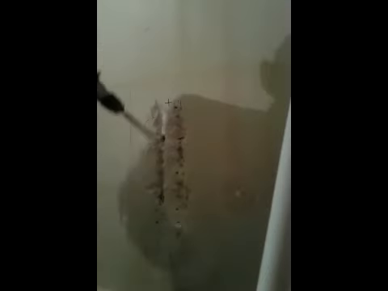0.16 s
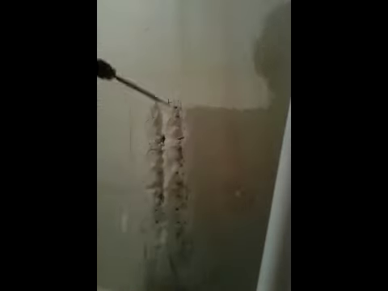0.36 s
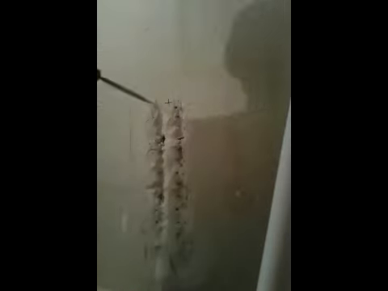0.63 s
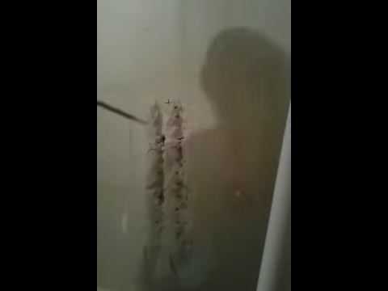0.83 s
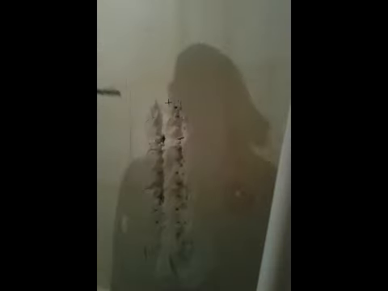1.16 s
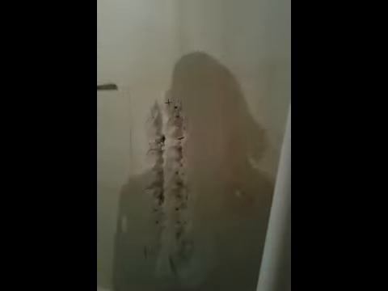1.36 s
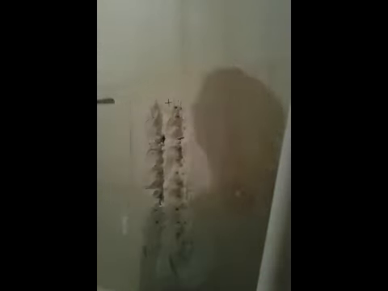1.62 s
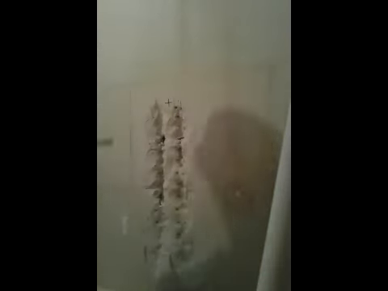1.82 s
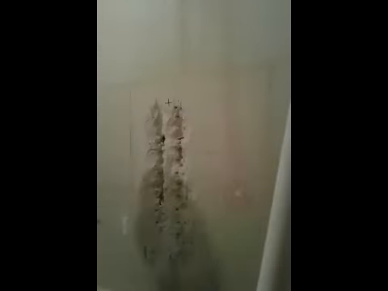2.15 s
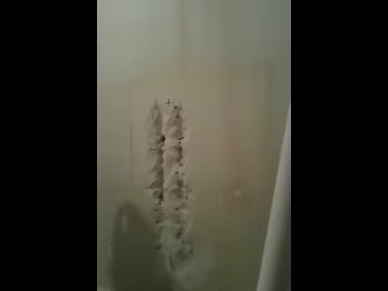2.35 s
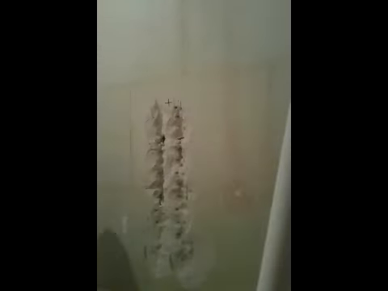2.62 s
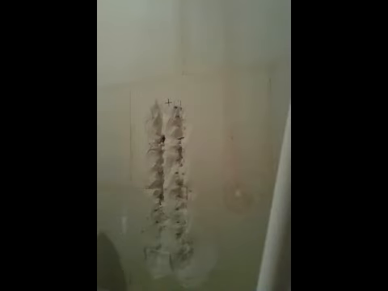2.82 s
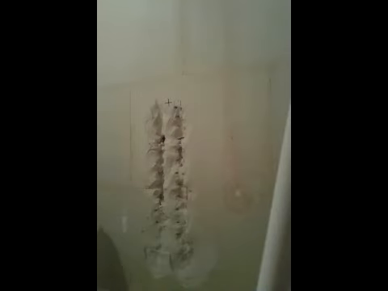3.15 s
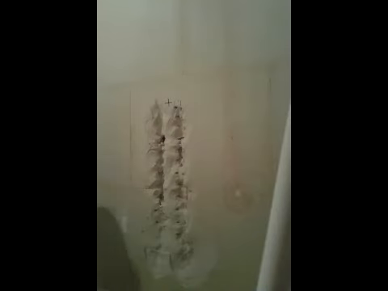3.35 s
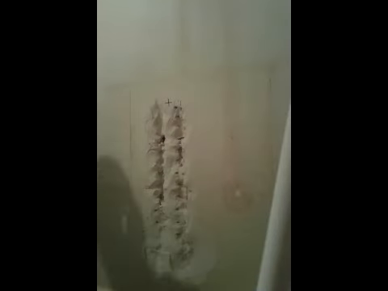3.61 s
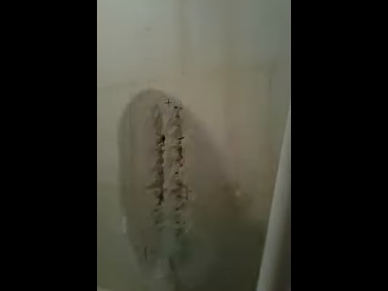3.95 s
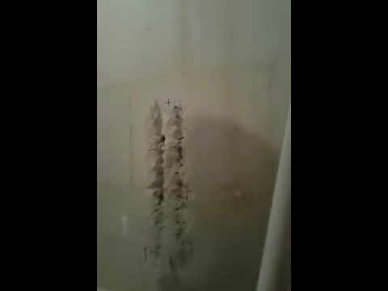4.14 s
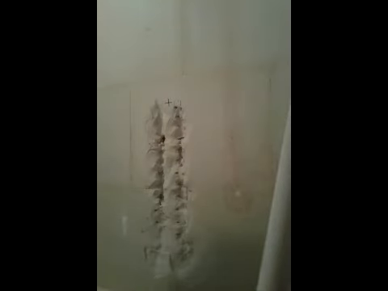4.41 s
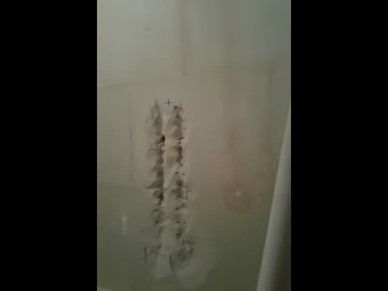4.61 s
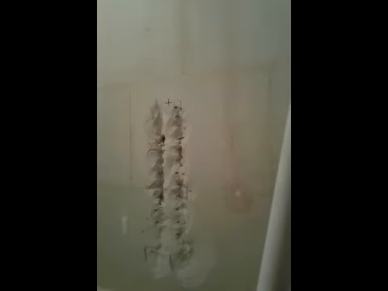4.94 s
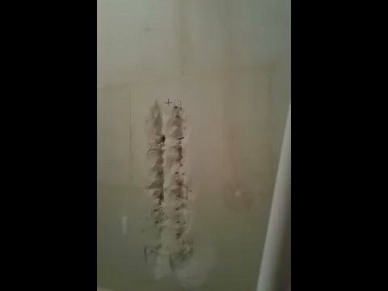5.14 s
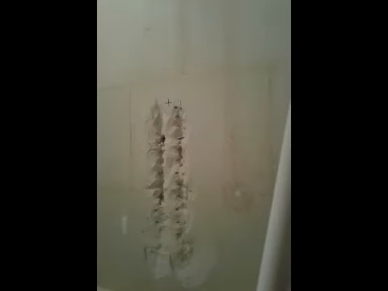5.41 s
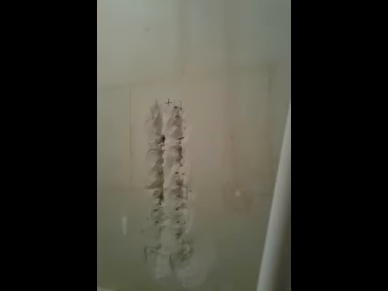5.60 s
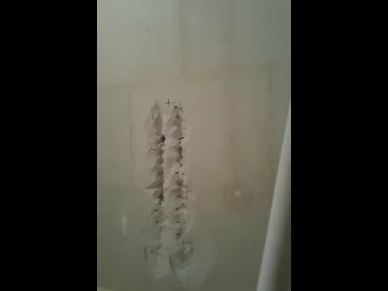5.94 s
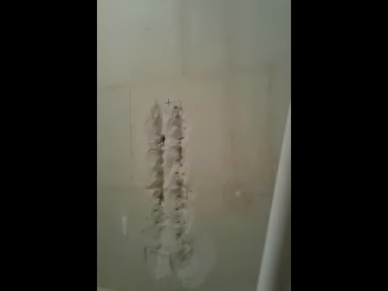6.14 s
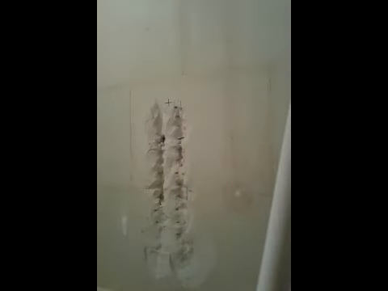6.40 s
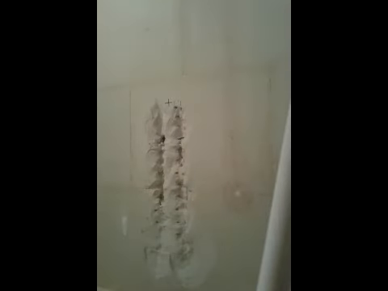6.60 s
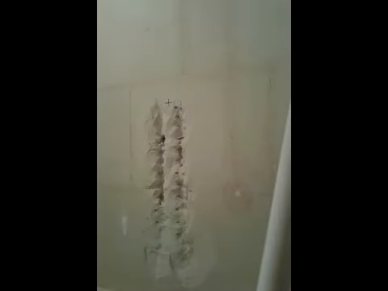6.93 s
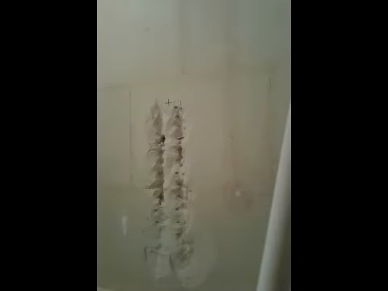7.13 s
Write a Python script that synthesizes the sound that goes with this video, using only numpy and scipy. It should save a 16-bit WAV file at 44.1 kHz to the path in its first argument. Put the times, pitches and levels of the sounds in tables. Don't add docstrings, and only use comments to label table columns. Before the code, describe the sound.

From 0 s a hammer drill, just switched off, spins down close to a mono phone microphone in a small, bare, echoing room. There is no hammering, only a dense scratchy brush noise with gear rattle, rushing fan air and piercing whines that slide continuously lower. It starts loudest, eases within the first second, then holds fairly steady to about 4 s. A low buzz from a far machine comes through the walls around 1-2.6 s. Tiny skips roughen the motor, with a sharp jolt near 2.3 s and a dull thump at 3.1 s. From 4.5 s the noise thins to a slower, low scratch, fading fast after 5.3 s and gone by about 6 s. Then, over faint hiss, shoes scuff on plaster grit at 6.26 s, the tool knocks the floor around 6.5-6.7 s, and a louder scrape and clack end it at 7.1-7.2 s.

```python
import sys
import numpy as np
from scipy import signal
from scipy.fft import rfft, irfft, next_fast_len
from scipy.io import wavfile
from scipy.ndimage import uniform_filter1d

SR = 44100
rng = np.random.default_rng(int(sys.argv[2]) if len(sys.argv) > 2 else 0)


def invert_db(x):
    u = np.asarray(x, float) / 20
    return 10 ** u


def to_wav(sig):
    pcm = np.clip(np.atleast_2d(sig), -1, 1) * 32767
    pcm = np.round(pcm).astype(np.int16)
    wavfile.write(sys.argv[1], SR, pcm.T)


N = 320597
T = np.arange(N) / SR
START_RPS = 421.9
TOP_HZ = 14090
RUMBLE_DB, RUMBLE_PER_WEIGHT = -24, 1.66


def unit(x):
    return x / np.sqrt(np.mean(x ** 2))


def colour(x, points):
    hz, db = np.transpose(points)
    size = next_fast_len(N)
    f = np.maximum(np.arange(size // 2 + 1) * SR / size, 1)
    gain = invert_db(np.interp(np.log(f), np.log(hz), db))
    return irfft(rfft(x, size) * gain, size)[:N]


def band(x, lo_hz, hi_hz):
    sos = signal.butter(4, [lo_hz, min(hi_hz, .45 * SR)], "bandpass", fs=SR, output="sos")
    return signal.sosfilt(sos, x)


def walk(rate):
    hold = int(SR / rate)
    steps = np.repeat(rng.standard_normal(N // hold + 1), hold)
    return unit(uniform_filter1d(uniform_filter1d(steps, hold), hold)[:N])


def grit(rate, spread_db):
    happens, sign, size = rng.random((3, N))
    return (happens < rate / SR) * np.sign(sign - .5) * invert_db(-spread_db * np.log(1 - size))


def room(x):
    t60_s, echo_db = 0.44, 0.5
    t = T[:SR // 2]
    tail = rng.standard_normal(len(t)) * np.exp(-np.log(1000) * t / t60_s) * (t > .003)
    tail *= invert_db(echo_db) / np.sqrt(np.sum(tail ** 2))
    tail[0] = 1
    return signal.fftconvolve(x, tail / np.sqrt(np.sum(tail ** 2)))[:N]


def carried(x):
    place = 0.73 * walk(1.48)
    return np.cos(place) * room(x) + np.sin(place) * room(rng.permutation(x))


def voiced(source, high_db, mid_db, top_db):
    # pitch_hz, level_db (per Hz)
    housing = [(1000, -12.5), (1350, -11.5), (1550, -4), (2280, -2), (2550, -7.5), (2800, -11.5),
               (3200, -13.5), (3900, -6.5), (5200, -5), (6300, 0.5), (9000, -14), (11000, -16),
               (11900, -18), (14000, -28)]
    heard = colour(source, housing)
    mid, high, top = band(heard, 1200, 3100), band(heard, 3100, 9200), band(heard, 9200, 15000)
    return invert_db(mid_db) * unit(mid) + invert_db(high_db) * (unit(high) + invert_db(top_db) * unit(top))


def spin():
    friction_rps2, drag_rps2, drag_power = 43, 106.9, 1.56
    speed, step_s = [START_RPS], .01
    for _ in range(int(T[-1] / step_s) + 1):
        braking = friction_rps2 + drag_rps2 * (speed[-1] / START_RPS) ** drag_power
        speed.append(max(speed[-1] - step_s * braking, 0))
    return np.interp(T, step_s * np.arange(len(speed)), speed)


def layers(speed):
    # time_s, level_db
    scratch = [(0, -10.5), (.4, -12.5), (.7, -12.5), (1.1, -14.5), (1.7, -13.5), (2.1, -14.5), (2.7, -14),
               (3.4, -14.5), (4.1, -14), (4.5, -16.5), (4.9, -19.5), (5.35, -24), (5.6, -29.5),
               (5.8, -39.5), (5.9, -46.5), (6.01, -66), (6.1, -82)]
    tilts = [
        (-6.5, 0.27, 0.03, 0.72),
        (-8.5, -4, 2, -0.13),
        (-16, -4, 2.7, 1),
    ]
    knee_rps, crawl_rps, wander_hz = 67.5, 6, 15
    time_s, level_db = np.transpose(scratch)
    scratch_db = np.interp(T, time_s, level_db) + 0.58 * walk(wander_hz)
    fast = np.log2(START_RPS / np.maximum(speed, knee_rps))
    slow = np.log2(knee_rps / np.clip(speed, crawl_rps, knee_rps))
    gear, fan, top = (db + fast_db * fast + slow_db * slow + wander_db * walk(wander_hz)
                      for db, fast_db, slow_db, wander_db in tilts)
    return scratch_db, scratch_db + gear, scratch_db + fan, top


def brush_skips():
    # middle_s, depth_db, length_s
    skips = [(0.49, -4, 0.013), (0.96, 0, 0.011), (1.23, 1, 0.024), (1.774, -4.5, 0.012),
             (2.281, 12.5, 0.015), (2.284, -13.5, 0.014), (3.095, -8, 0.013), (3.182, -18, 0.0016),
             (3.443, -4.5, 0.0099), (3.612, -8, 0.006), (3.718, -6, 0.018), (3.788, -3.5, 0.02),
             (3.845, 1, 0.069), (4.632, 0, 0.03), (5.457, -0.5, 0.017), (5.652, 2, .025), (5.794, 4, 0.032)]
    return sum(db * np.exp(-((T - s) / length_s) ** 2) for s, db, length_s in skips)


def brushes_and_gears(turns, skips_db, scratch_db, gear_db, top_db):
    bars = 1 + 0.075 * np.cos(2 * np.pi * 24 * turns) + 0.11 * np.cos(2 * np.pi * turns)
    ticks = unit(grit(7000, 1.4) + 0.87 * carried(grit(14000, 1.56)))
    chatter = bars * invert_db(skips_db + 0.53 * walk(25.003)) * ticks
    return voiced(chatter, scratch_db, gear_db, top_db + .8 * np.maximum(skips_db, 0))


def fan_rush(skips_db, fan_db):
    # pitch_hz, level_db (per Hz)
    rush = [(120, -55), (200, -22.5), (318, -13.5), (396, -11), (583, -10), (696, -3.5), (889, -5),
            (1090, -6), (1500, -4.5), (1950, -23), (3300, -120)]
    air = carried(rng.standard_normal(N)) + 1.11 * rng.standard_normal(N)
    return invert_db(fan_db + skips_db + 0.6 * walk(20)) * unit(band(colour(air, rush), 230, 1470))


def whines(speed, turns, scratch_db):
    orders = [2, 10, 12, 20, 24, 30, 36, 48, 72]
    # level_db over the scratch, change_db per halving of speed
    strengths = [(-14, -9), (-15, -7), (-21, -4), (-12, -11), (-17, 3), (-22, -8), (-24, 0), (-19, 2),
                 (-30, 3)]
    # pitch_hz, level_db
    radiate = [(250, -40), (500, -12), (900, -6), (1300, -10), (1700, -14), (3000, -19), (3700, -3.5),
               (5000, -2), (6400, 2.5), (7400, 0), (8600, -13), (12000, -30)]
    halvings = np.log2(START_RPS / np.maximum(speed, 20))
    whine = 0
    for k, (db, slope_db) in zip(orders, strengths):
        wobble = .95 * walk(110)
        tone = np.sin(2 * np.pi * k * turns + wobble) * (k * speed < TOP_HZ)
        whine = whine + invert_db(db + slope_db * halvings + 2.5 * walk(28)) * tone
    turning = np.clip(speed / 10 - 4.2, 0, 1)
    loudness = np.sqrt(2) * invert_db(uniform_filter1d(scratch_db, SR // 5))
    whine = loudness * turning * colour(whine, radiate)
    return .8 * whine + .6 * room(whine)


def shaft_hum(speed, turns):
    # pitch_hz, width_hz, level_db (rms)
    modes = [(435, 20, -42.5), (391, 34, -27.5), (338, 36, -32), (296.3, 20, -31), (269, 13, -36.5),
             (239, 7.6, -60), (213, 44, -43)]
    # pitch_hz, width_hz, level_db
    rings = [(203, 2.2, -25), (297, 4, -32), (392, 5, -30)]
    power = sum(invert_db(db) ** 2 / (1 + ((speed - hz) / (width / 2)) ** 2) ** 3 for hz, width, db in modes)
    hum = np.sqrt(2 * power) * invert_db(2.0 * walk(17)) * np.sin(2 * np.pi * turns + .5 * walk(31))
    beat = np.sin(2 * np.pi * turns)
    for hz, width, db in rings:
        hum = hum + invert_db(db) * signal.lfilter(*signal.iirpeak(hz, hz / width, SR), beat)
    return hum


def drill(speed, scratch_db, gear_db, fan_db, top_db):
    turns = np.cumsum(speed) / SR
    skips_db = brush_skips()
    on = np.clip((6.1 - T) / 0.029, 0, 1)
    rattle = brushes_and_gears(turns, skips_db, scratch_db, gear_db, top_db)
    whine = whines(speed, turns, scratch_db)
    return on * (rattle + whine + fan_rush(skips_db, fan_db) + shaft_hum(speed, turns))


def drags(offset_db, per_weight, fall_share):
    # peak_s, scrape_db, rise_s, fall_s, weight_db
    scuffs = [
        (6.263, -33, 0.016, 0.23, 0.5),
        (6.47, -36, 0.067, 0.14, 4),
        (6.545, -42, 0.025, 0.098, 13.5),
        (6.78, -48.5, .03, 0.51, 6),
        (6.975, -43, .035, .2, 3),
        (7.07, -41.5, 0.036, .1, -2),
        (7.14, -32.5, 0.042, 0.13, 0),
        (7.24, -49, .021, .1, 5.5),
    ]
    power = 1e-12
    for s, db, rise_s, fall_s, weight in scuffs:
        shape = np.where(T < s, -((T - s) / rise_s) ** 2, (s - T) / (fall_s * fall_share))
        power = power + (invert_db(db + offset_db + per_weight * weight) * np.exp(shape)) ** 2
    return 10 * np.log10(power)


def floor(fan_db):
    # pitch_hz, level_db (per Hz)
    hiss_shape = [(24, -34), (40, -5), (183, -11), (796, -9.5), (899, -17), (2120, -7), (2710, -20),
                  (7220, -6.5), (8160, -23.5), (14000, -12)]
    # pitch_hz, level_db (rms)
    whistles = [
        (4538, -86),
        (7144, -80),
    ]
    rests_s = 3.6
    lifted_db = -4.5 * np.minimum(T, rests_s)
    fan_shake = invert_db(fan_db - 21 + lifted_db + 15 * (T > rests_s))
    feet_shake = invert_db(drags(RUMBLE_DB - 14, RUMBLE_PER_WEIGHT, 1))
    noise = rng.standard_normal(N)
    rumble = unit(band(noise, 90, 240)) + invert_db(-18) * unit(band(noise, 36, 76))
    boards = (fan_shake + feet_shake) * invert_db(2.5 * walk(15)) * rumble
    out = boards + invert_db(-64.5) * unit(colour(rng.standard_normal(N), hiss_shape))
    for hz, db in whistles:
        out = out + invert_db(db) * unit(band(rng.standard_normal(N), hz - 60, hz + 60))
    return out


def swell(middle_s, half_s, db):
    return invert_db(db - 7 * ((T - middle_s) / half_s) ** 4)


def far_machine():
    # multiple of the firing rate, level_db
    partials = [(3, -46.5), (4, -49.5), (5, -40), (6, -44.5), (8, -39.5), (10, -53.5)]
    # middle_s, half_s, level_db
    low_swells = [
        (5.05, 0.74, -63),
        (6.8, .6, -80),
    ]
    # middle_s, half_s, level_db
    octave_swells = [
        (3.65, 0.9, -60),
        (4.7, 0.87, -63),
        (6.7, .5, -79),
    ]
    hz = np.interp(T, [2.4, 2.4 + 1.47], [76.6, 75.4])
    cycle = 2 * np.pi * np.cumsum(hz * (1 + .003 * walk(5))) / SR
    buzz = sum(invert_db(db + 1.8 * walk(6)) * np.sin(k * cycle + k * k) for k, db in partials)
    buzz = swell(middle_s=1.82, half_s=0.78, db=0) * buzz
    low = sum(swell(*row) for row in low_swells) * np.sin(cycle)
    octave = sum(swell(*row) for row in octave_swells) * np.sin(2 * cycle)
    return np.sqrt(2) * (buzz + low + octave)


def knocks():
    # start_s, peak_db, lowest_hz, top_hz, decay_s
    blows = [(3.122, -29.5, 102, 290, 0.12), (5.55, -40, 214, 470, 0.076), (6.135, -48, 4200, 7640, .031),
             (6.218, -44, 3000, 12000, .05), (6.258, -50, 100, 700, .03), (6.341, -38, 300, 900, 0.017),
             (6.526, -32.5, 300, 1090, 0.096), (6.528, -30.5, 1046, 2570, 0.079),
             (3.4, -36.5, 90, 200, 0.12), (6.68, -35, 252, 900, 0.022), (6.739, -39, 150, 675, 0.018),
             (7.102, -54, 129, 400, .03), (7.22, -32, 900, 2400, 0.046), (7.225, -45, 221, 424, 0.035)]
    out, t = np.zeros(N + SR), T[:SR // 2]
    for s, db, lo_hz, top_hz, decay_s in blows:
        burst = band(rng.standard_normal(len(t)) * np.exp(-t / decay_s), lo_hz, top_hz)
        start = int(s * SR)
        out[start:start + len(t)] += invert_db(db) * burst / np.max(np.abs(burst))
    return room(out[:N])


def shoes():
    scrape_db = drags(0, 0, 1)
    crunch_db = drags(-15.5, 0.69, 1)
    sparkle_db = np.maximum(drags(-10.5, 0, 0.39) - scrape_db, -17)
    crumbs = room(invert_db(1.5 * walk(40)) * grit(12000, 1.8))
    thuds = unit(band(room(grit(2500, 2.2)), 340, 1300))
    rumble = invert_db(drags(RUMBLE_DB, RUMBLE_PER_WEIGHT, 1)) * thuds
    return voiced(crumbs, scrape_db, crunch_db, sparkle_db) + rumble


def scene():
    speed = spin()
    levels = layers(speed)
    fan_db = levels[2]
    mono = drill(speed, *levels) + floor(fan_db) + far_machine() + knocks() + shoes()
    return np.array([mono, mono])


def roll_off(x):
    return signal.sosfilt(signal.butter(12, 15070, fs=SR, output="sos"), x)


def record(dry):
    rounded = dry / (1 + (dry / .76) ** 4) ** .25
    no_bass = signal.sosfilt(signal.butter(2, 35, "highpass", fs=SR, output="sos"), rounded)
    cut = signal.sosfilt(signal.ellip(10, .2, 80, TOP_HZ, fs=SR, output="sos"), no_bass)
    return roll_off(cut)


dry = scene()
out = record(dry)
to_wav(out)
```